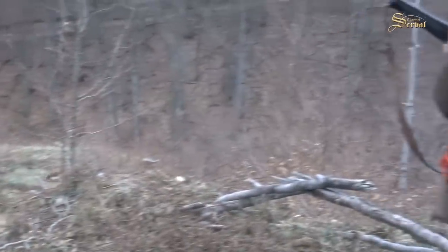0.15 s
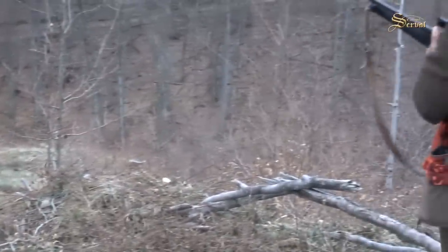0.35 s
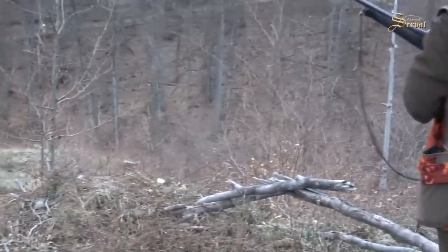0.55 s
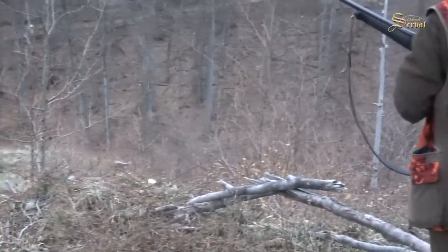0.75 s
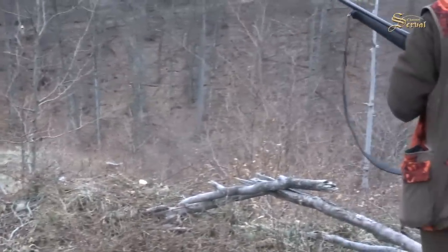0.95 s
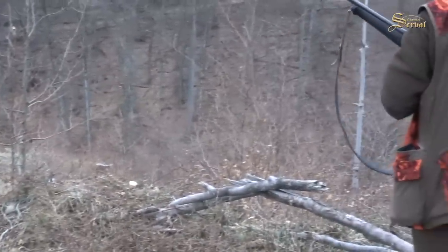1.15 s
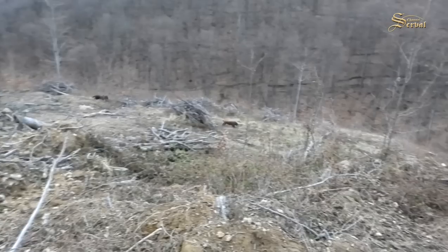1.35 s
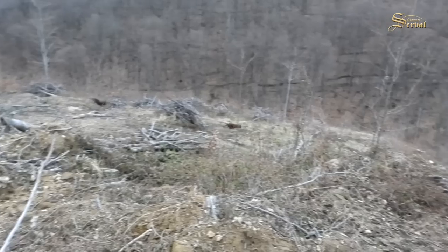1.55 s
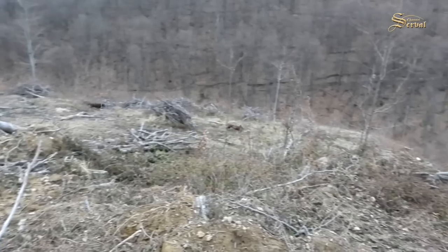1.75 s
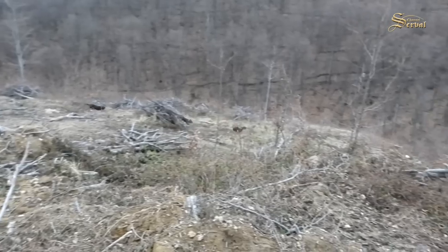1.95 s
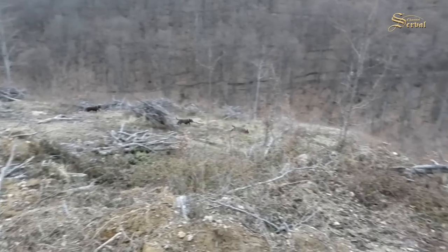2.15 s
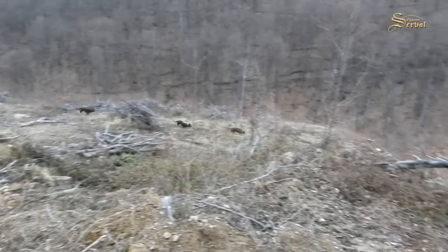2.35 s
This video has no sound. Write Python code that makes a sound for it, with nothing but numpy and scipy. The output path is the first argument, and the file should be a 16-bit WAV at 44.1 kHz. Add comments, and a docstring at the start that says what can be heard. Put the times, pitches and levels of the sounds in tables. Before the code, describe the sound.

Pack of hounds yelping and barking in short high bursts across a windy open clearing

```python
"""A pack of hounds yelps and barks across an open clearing: yelps are nearly pure gliding tones with
a few overtones, barks are hoarse, with half lines between their harmonics and breath noise.
Thin gliding sine whistles, crackling twig snaps and one longer rustle sound between and during
the calls; trees return a short echo. Gusty wind, low lumpy noise, rumbles on both microphone ports;
dry leaves rustle at a distance."""
import sys
import numpy as np
from scipy import signal
from scipy.fft import rfft, irfft
from scipy.io import wavfile
from scipy.ndimage import uniform_filter1d

SR = 44100
rng = np.random.default_rng(int(sys.argv[2]) if len(sys.argv) > 2 else 0)


def undo_db(level):
    """Turn decibels back into plain size, where 20 dB means ten times bigger."""
    steps = np.asarray(level, float) / 20
    return 10 ** steps


def wav_record(signal):
    """Record a signal, one row per channel, as 16-bit PCM in the file named by sys.argv[1]."""
    frames = np.transpose(np.atleast_2d(signal))
    bounded = np.clip(frames, -1, 1)
    # unit amplitude maps onto the largest positive 16-bit level
    quanta = np.round(bounded * 32767).astype(np.int16)
    wavfile.write(sys.argv[1], SR, quanta)


N = 110250  # 2.5 s

# yelp lines, one curve each: whole yelps, a side line sounding with the yelp at 2.125 s,
# and the falling upper line of a bark at 1.474 s: t/s, pitch f/Hz, level of the fundamental/dB
YELP_LINES = [
    [(.188, 1420, -23), (.232, 1330, -32)],
    [(.204, 740.4, -22), (.228, 1158, -20.5), (.258, 1347, -9), (.284, 1290, -3.5)],
    [(.928, 810, -32), (.962, 1368, -13.5), (.993, 1292, -10), (1.005, 1346, -30.5), (1.048, 1210, -8)],
    [(1.09, 1564, -10.5), (1.114, 1320, -31)],
    [(1.315, 1923, -12), (1.358, 2060, -24.5)],
    [(1.346, 1330, -30), (1.372, 1330, -32)],
    [(1.374, 829, -36.5), (1.406, 1173, -11.5), (1.452, 1214, -10)],
    [(1.474, 1411, -6), (1.503, 740, -23.5)],
    [(1.526, 1600, -5), (1.553, 1250, -18.5)],
    [(1.734, 1560, -20.5), (1.765, 1720, -30), (1.797, 1290, -29.5)],
    [(1.944, 1495, -32), (1.98, 1662, -16.5), (2.015, 1565, -16), (2.036, 1174, -39.5)],
    [(2.125, 1603, -10), (2.15, 1393, -9), (2.184, 1337, -14), (2.202, 886, -16)],
    [(2.125, 1950, -27.5), (2.18, 1780, -32.5)],
    [(2.431, 900, -23.5), (2.453, 900, -21.5)],
    [(2.447, 1150, -30), (2.468, 1530, -32), (2.51, 1600, -22)],
]
# overtone strength of each yelp line: level/dB
YELP_OVERTONES = [-47, -23, -10, -22, -18, -29.5, -30, -64, -28, -43, -24, -32.5, -32, -21, -10.5]
# what the mouth does to overtones: f/Hz, level/dB
MOUTH_RESPONSE = [(3200, 0), (3800, -13), (4100, 1), (4600, -12), (8000, -27)]
# hoarse barks, one curve each: t/s, pitch f/Hz, level of the octave above the pitch/dB
BARK_CURVES = [
    [(.278, 766, -9), (.308, 738.2, -10), (.327, 605, -2), (.333, 463, -28), (.352, 315, -12.5)],
    [(0.987, 685.5, -41), (1.001, 761, -25.5), (1.052, 650, -34)],
    [(1.022, 780.9, -22), (1.068, 927, -17.5), (1.098, 828, -19)],
    [(1.428, 607, -29), (1.456, 746.6, -17), (1.492, 626.5, -18.5)],
    [(1.455, 555.5, -14), (1.487, 805.5, -16.5), (1.527, 882, -14.5)],
]
# make-up of each bark against its octave: pitch line level/dB, half lines level/dB,
# third multiple level/dB, breath noise level/dB
BARK_MIXES = [(-7.5, -14.5, -60, -14.5), (17.5, -13.5, -4, 8), (-14.5, -14.5, -18.5, -13.5),
              (1, -10, -12, -16), (-16, -43.5, -9, -14)]
# relative spectrum of breath noise: f/Hz, level/dB per Hz
BREATH_SPECTRUM = [(600, -21), (1300, -5.5), (3100, -26), (6000, -18.5), (17000, -61)]
# thin whistles: start t/s, length t/s, level/dB, start f/Hz, end f/Hz
WHISTLE_GLIDES = [(0.078, 0.077, -49.5, 4770, 5580), (0.508, 0.055, -41, 5010, 5270),
                  (.555, 0.078, -38, 5060, 4910), (.558, 0.042, -48.5, 5600, 4800),
                  (0.898, 0.044, -35.5, 6040, 6450), (1.672, .034, -30, 5700, 6010),
                  (2.075, 0.031, -33.5, 6130, 5950), (2.204, 0.027, -37.5, 4040, 4510),
                  (2.459, 0.032, -23, 5350, 6120)]
# bow of each whistle's glide at its middle, upward if positive: f/Hz
WHISTLE_BOWS = [58, 767, -550, 555, 47, 203, 320, 96, 743.5]
# twig snaps, and one longer rustle at 1.726 s: t/s, level/dB, spread t/s
SNAPS_AND_RUSTLE = [(0.084, -33.5, 0.0058), (1.726, -33.5, 0.075), (1.911, -30, 0.0015),
                    (2.319, -27.5, 0.0053)]
# relative spectrum of wind on the ports: f/Hz, level/dB per Hz
WIND_SPECTRUM = [(25, -55), (80, -41.5), (150, -7), (300, -1), (600, -14.5), (2500, -55.5)]
# course of the gusts: t/s, level/dB
GUST_CURVE = [(0, -28.5), (.78, -27.5), (.86, -34.5), (1.32, -27), (1.37, -49), (1.55, -25), (1.74, -25),
              (1.81, -40.5), (2.1, -22), (2.33, -25.5), (2.4, -33.5)]
# relative spectrum of dry brush, rustling or snapping: f/Hz, level/dB per Hz
BRUSH_SPECTRUM = [(500, -19.5), (1300, -6.5), (2000, -15.5), (2700, -23.5), (6000, -24), (16000, -48.5)]


def yelp(rows, overtone_db):
    """A nearly pure tone with uneven overtones, coloured by the mouth, and some breath."""
    breath_db = -21.5
    gate, (hz, db) = follow(rows)
    turn = phase(hz)
    level = gate * undo_db(db)
    mouth_hz, mouth_db = np.transpose(MOUTH_RESPONSE)
    overtones = 0
    for k in range(2, 6):
        strength_db = np.interp(k * hz, mouth_hz, mouth_db) + 4 * wander(70)[0]
        overtones = overtones + undo_db(strength_db) * np.sin(k * turn)
    overtones = overtones * (hz / hz.max()) ** 6  # brightest at the top of the pitch
    voice = np.sqrt(2) * (np.sin(turn) + undo_db(overtone_db) * overtones)
    return level * voice + undo_db(breath_db) * breath(level)


def bark(rows, pitch_db, half_db, third_db, breath_db):
    """Pitch and octave, half lines from strong-weak cycles, hoarse breath."""
    gate, (hz, db) = follow(rows)
    turn = phase(hz)
    halves = np.sin(3 * turn / 2) + undo_db(-8) * np.sin(5 * turn / 2)
    thirds = np.sin(3 * turn) + undo_db(-13.5) * np.sin(6 * turn)
    lines = undo_db(pitch_db) * np.sin(turn) + np.sin(2 * turn)
    lines = lines + undo_db(half_db) * halves + undo_db(third_db) * thirds
    rough_level = gate * undo_db(db + 2 * wander(110)[0])
    return rough_level * np.sqrt(2) * lines + undo_db(breath_db) * breath(gate * undo_db(db))


def breath(level):
    """Air rushing unevenly through the throat; it swells and fades more softly than the voice."""
    uneven = rng.standard_normal(N) * undo_db(1.5 * wander(40)[0])
    air = coloured(uneven, BREATH_SPECTRUM)
    return uniform_filter1d(level, size=SR // 30) * air


def whistle(start, length, db, start_hz, end_hz, bow_hz):
    """A faint sine of wavering level on a bowed glide."""
    rasp_db = 5  # rms of the wavering
    u = np.clip((np.arange(N) / SR - start) / length, 0, 1)  # share of the glide done
    arch = np.sin(np.pi * u)
    hz = start_hz + (end_hz - start_hz) * u + bow_hz * arch
    level = undo_db(db + rasp_db * wander(56)[0]) * np.sqrt(abs(arch)) * (u < 1)
    return level * np.sin(phase(hz))


def snaps_and_rustle():
    """Snaps and a rustle, noise under bell-shaped envelopes."""
    t = np.arange(N) / SR
    shape = sum(undo_db(db) * np.exp(-((t - s) / spread) ** 2) for s, db, spread in SNAPS_AND_RUSTLE)
    return shape * coloured(rng.standard_normal(N), BRUSH_SPECTRUM)


def wind():
    """Lumpy low turbulence, different at each microphone port."""
    gust_db = follow(GUST_CURVE)[1][0]
    shared_db = 3.3 * wander(25)
    port_db = 1.8 * wander(40, channels=2)
    lumps = undo_db(gust_db + shared_db + port_db)
    return lumps * coloured(rng.standard_normal((2, N)), WIND_SPECTRUM)


def brush():
    """Distant rustle of dry leaves, noise partly shared by the ports, rising a little with the gusts."""
    rustle_db, gust_share, same = -43.5, 0.14, 0.66  # same: amplitude share common to both ports
    gust_db = follow(GUST_CURVE)[1][0]
    grains = rng.standard_normal((3, N))
    pair = same * grains[0] + np.sqrt(1 - same ** 2) * grains[1:]
    level_db = rustle_db + gust_share * (gust_db - gust_db.mean()) + 1.3 * wander(10)
    return undo_db(level_db) * coloured(pair, BRUSH_SPECTRUM)


def clearing(x):
    """The left port hears the sources a moment earlier; trees scatter a short decaying echo."""
    left_lead_s, echo_db, echo_t60_s = 4.5e-5, -20.5, 0.49
    hz = np.fft.rfftfreq(N, 1 / SR)
    t = np.arange(SR // 2) / SR
    # a true time lead up to 5500 Hz, a constant phase lead above
    lead = np.exp(2j * np.pi * np.minimum(hz, 5500) * left_lead_s)
    left = irfft(rfft(x) * lead, N)
    tail = rng.standard_normal((2, len(t))) * undo_db(-60 * t / echo_t60_s)
    echo = signal.fftconvolve(x[None], tail / np.linalg.norm(tail[0]), axes=1)[:, :N]
    return np.array([left, x]) + undo_db(echo_db) * echo


def follow(rows):
    """A gate open along a curve with 4 ms edges, and the curve's later columns at every sample."""
    t = np.arange(N) / SR
    rows = np.array(rows, float)
    to_edge = np.minimum(t - rows[0, 0], rows[-1, 0] - t)
    gate = np.clip(to_edge / 0.004, 0, 1)
    return gate, [np.interp(t, rows[:, 0], col) for col in rows.T[1:]]


def phase(hz):
    """Running phase of a slightly unsteady pitch, from a random start."""
    unsteady = hz * (1 + 0.012 * wander(143)[0])
    return 2 * np.pi * (np.cumsum(unsteady) / SR + rng.random())


def wander(cutoff_hz, channels=1):
    """Slow chance: noise below a cutoff, rms 1."""
    noise = rng.standard_normal((channels, N))
    return evened(signal.lfilter(*signal.butter(2, cutoff_hz, fs=SR), noise))


def coloured(x, spectrum):
    """Filters by a spectrum table, interpolated over log frequency; rms 1."""
    hz = np.fft.rfftfreq(x.shape[-1], 1 / SR)
    f, db = np.transpose(spectrum)
    gain = undo_db(np.interp(np.log(hz + 1), np.log(f + 1), db))
    return evened(irfft(rfft(x) * gain, x.shape[-1]))


def evened(x):
    """Scales to rms 1."""
    return x / np.sqrt(np.mean(x ** 2) + 1e-20)


def scene():
    """Hounds, whistles, snaps and a rustle in the clearing, over wind and brush."""
    hounds = sum(yelp(*c) for c in zip(YELP_LINES, YELP_OVERTONES))
    hounds = hounds + sum(bark(rows, *mix) for rows, mix in zip(BARK_CURVES, BARK_MIXES))
    whistles = sum(whistle(*glide, bow) for glide, bow in zip(WHISTLE_GLIDES, WHISTLE_BOWS))
    return clearing(hounds + snaps_and_rustle() + whistles) + wind() + brush()


def roll_off(x):
    """The treble ends steeply here."""
    return signal.sosfilt(signal.butter(12, 16770, fs=SR, output="sos"), x)


def record(dry):
    """Overload clips the loudest peaks at full scale."""
    mix = np.clip(dry, -1, 1)
    return roll_off(mix)


dry = scene()
out = record(dry)
wav_record(out)
```